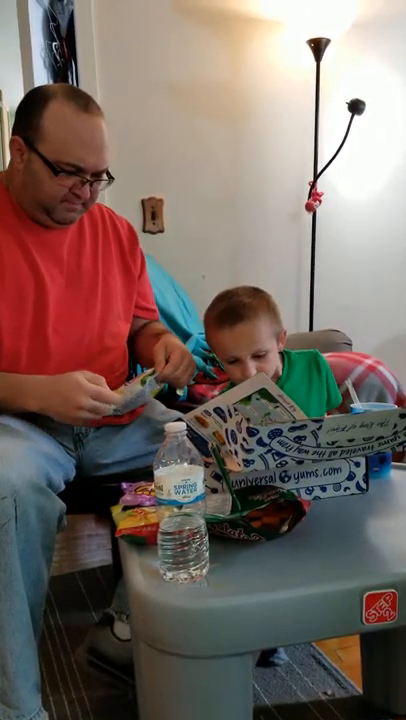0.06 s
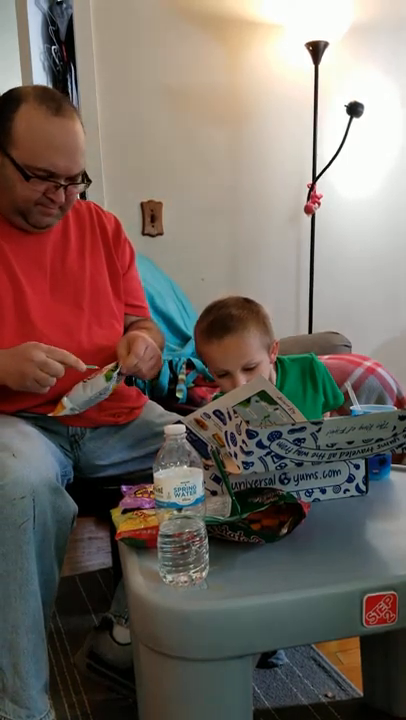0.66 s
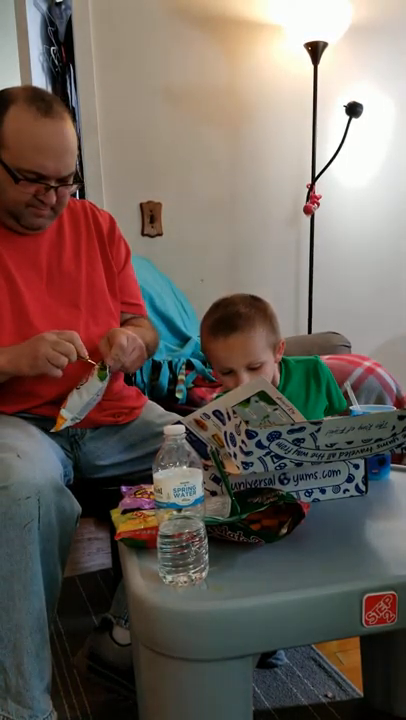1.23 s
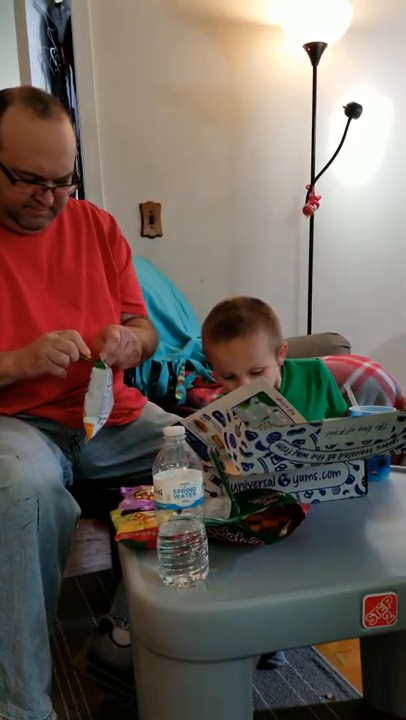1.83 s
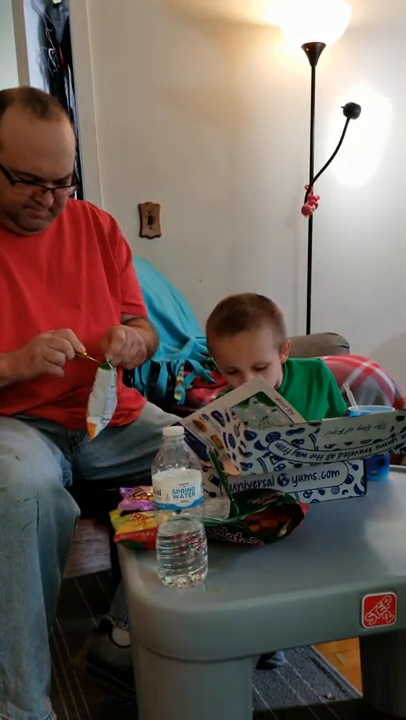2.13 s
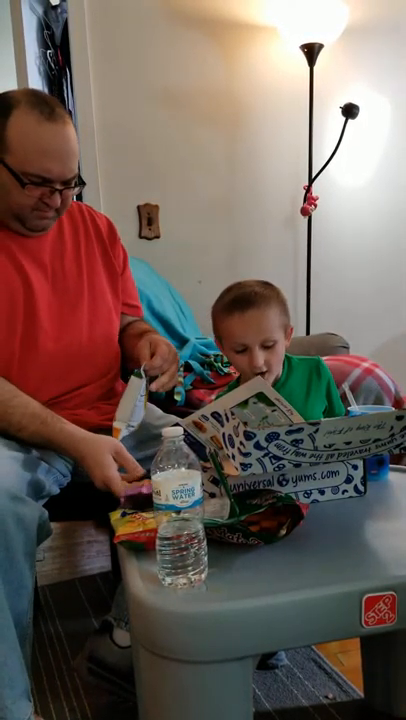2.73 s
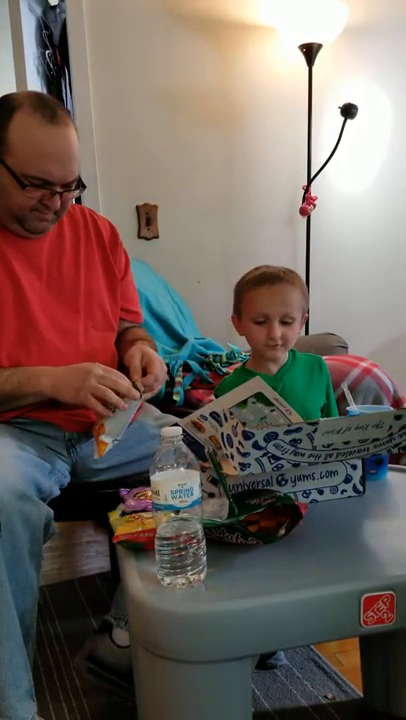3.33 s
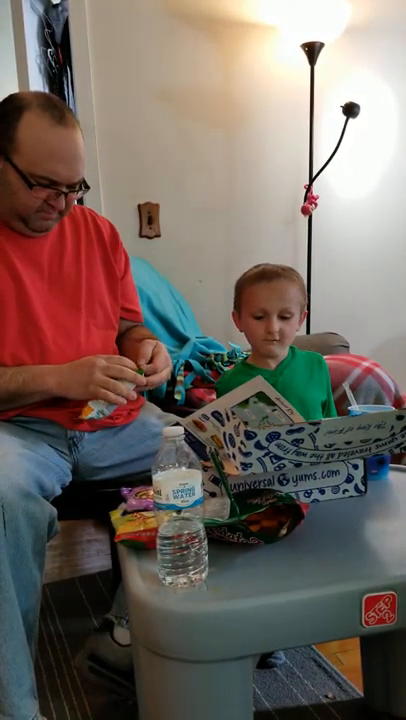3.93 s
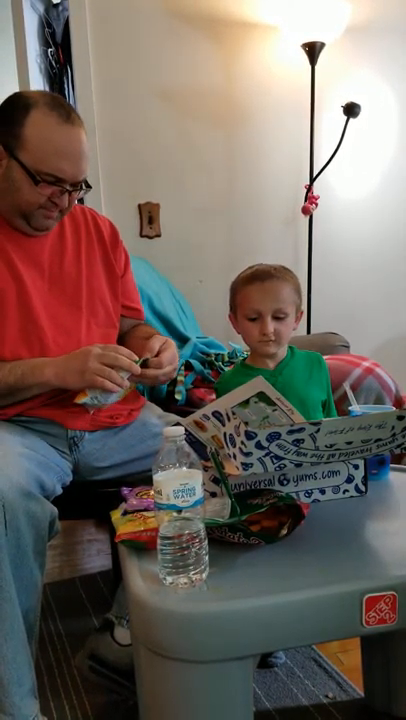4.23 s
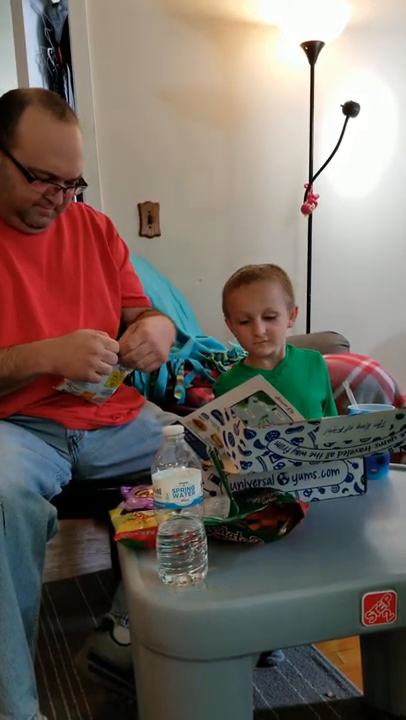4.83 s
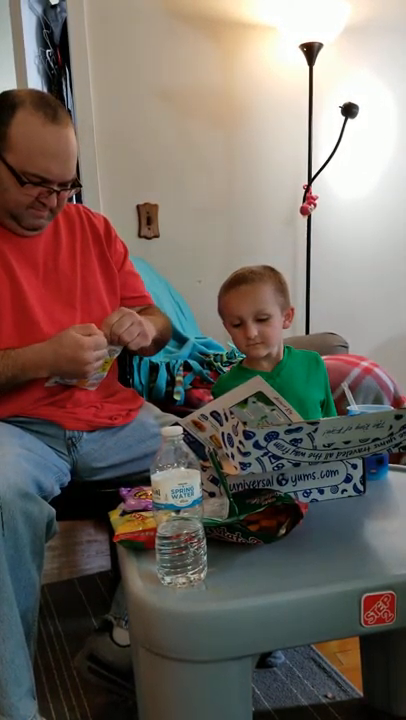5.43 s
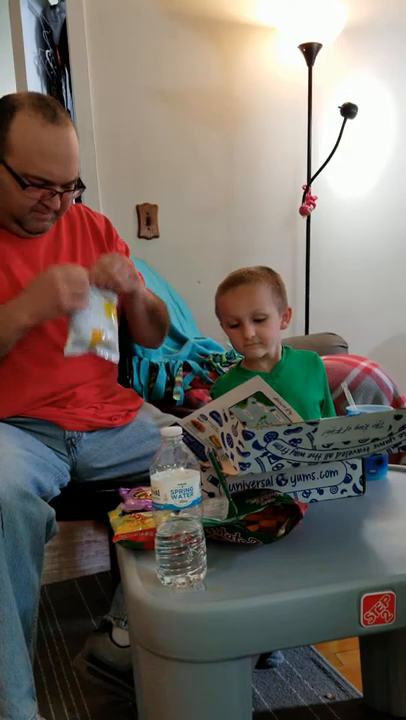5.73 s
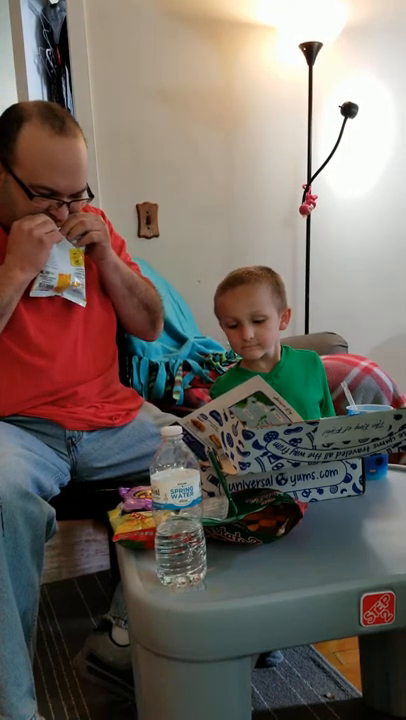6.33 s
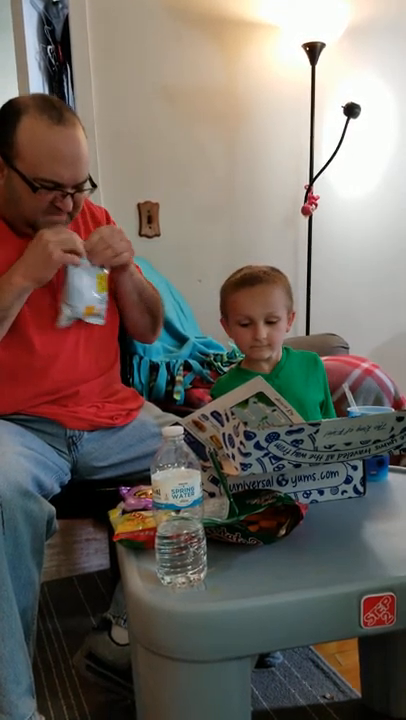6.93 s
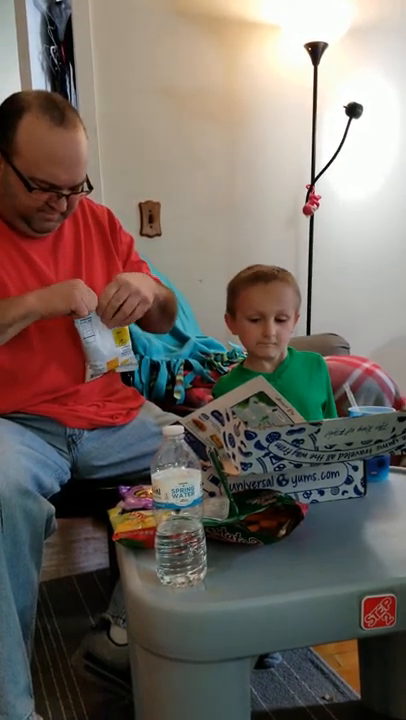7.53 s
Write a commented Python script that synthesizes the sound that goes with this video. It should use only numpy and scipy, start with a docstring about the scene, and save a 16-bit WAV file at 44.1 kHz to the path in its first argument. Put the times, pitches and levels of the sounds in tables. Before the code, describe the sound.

In a quiet living room with a low hum, a plastic snack packet crackles and snaps as it is tugged again and again. The crinkling pauses for a short, boomy scrape with a few knocks on a hollow plastic table, then carries on in dense bursts. Soft handling thumps touch the microphone at the end. The sound is a metre or two off, with the right side muffled to little but bass.

```python
"""Living room, handheld camera a metre or two from a sofa; the right microphone is all but blocked and
hears little except bass. From the start, over a low hum, hands pull at a small plastic snack packet:
each pull sets off a fine crackle, the film buckles in sharp snaps, and the room answers each snap.
A hollow plastic table takes a faint knock at 0.8 s, and something scuffs across it from 2.6 to 3 s.
Around 6 s teeth take over the pulling; from 6.8 s the packet is lowered and the camera is nudged."""
import sys
import numpy as np
from scipy import signal
from scipy.fft import rfft, irfft
from scipy.io import wavfile
from scipy.ndimage import uniform_filter1d

SR = 44100
rng = np.random.default_rng(int(sys.argv[2]) if len(sys.argv) > 2 else 0)


def materialize(psi):
    """Save the field psi as 16-bit PCM at rate SR to the path in sys.argv[1].

    A 1-D psi becomes a single channel; in a 2-D psi each row is a channel.
    """
    bounded = np.clip(np.atleast_2d(psi).T, -1, 1)
    quanta = np.round(bounded * 32767).astype(np.int16)
    wavfile.write(sys.argv[1], SR, quanta)


N = 333816
TIME, HZ = np.arange(N) / SR, np.fft.rfftfreq(N, 1 / SR)
SAMPLES_PER_MS = SR / 1000


def amp(db):
    """Decibels to gain."""
    return 10 ** (np.asarray(db) / 20)


def read(points, hz, column=1):
    """One column of a table, interpolated on a log-frequency axis."""
    points = np.asarray(points, float)
    return np.interp(np.log(hz + 1), np.log(points[:, 0] + 1), points[:, column])


def add(mix, start_s, sound):
    """Mixes a sound in at start_s."""
    part = mix[max(round(start_s * SR), 0):][:len(sound)]
    part += sound[:len(part)]


def causal(db):
    """The minimum-phase response with this gain: it rings only after its cause."""
    cepstrum = irfft(np.log(amp(db)))
    half = len(cepstrum) // 2
    cepstrum[1:half] *= 2
    cepstrum[half + 1:] = 0
    return np.exp(rfft(cepstrum))


def colour(x, spectrum, rings=()):
    """A filter of unit power gain: a smooth spectrum with narrow peaks or dips."""
    peaks_db = sum(lift_db / (1 + (2 * (HZ - hz) / width) ** 2) for hz, width, lift_db in rings)
    db = read(spectrum, HZ) + peaks_db
    return irfft(rfft(x) * causal(db), N) / np.sqrt(np.mean(amp(db) ** 2))


def brighten(x, db, split_hz=2500):
    """Raises or lowers the treble along a curve of dB."""
    body = irfft(rfft(x) / (1 + (HZ / split_hz) ** 4), N)
    return body + (x - body) * amp(db)


# Room tone at the two microphones: frequency_hz, left_db_per_hz, right_db_per_hz
ROOM_TONE = [(20, -95, -94), (65, -82.5, -80.5), (128.5, -84, -95), (208, -95, -106), (400, -101, -111),
             (1070, -108, -115), (3300, -113, -118), (4830, -110, -119), (9000, -119, -121),
             (11600, -115, -117), (15900, -116, -113)]
def room_tone():
    """Low room hum and faint hiss in each microphone, there throughout."""
    density = amp([read(ROOM_TONE, HZ, column) for column in (1, 2)]) * np.sqrt(SR / 2)
    return irfft(rfft(rng.standard_normal((2, N))) * density, N)


# First reflections off lap, table and walls: delay_s, level_db
REFLECTIONS = [(.0067, -13), (.0075, -18.5), (.0089, -12.5), (0.0104, -17.5), (0.0092, -16), (0.02, -12)]
# Decay of the living room: frequency_hz, t60_s
ROOM_DECAY = [(150, 0.72), (530, 0.3), (1400, 0.26), (3700, 0.27), (9700, 0.22), (16000, 0.25)]
def room_path(direct_db, tail_db=-3.0, echo_db=0, wander=0.06, build_s=0.0013):
    """From one spot in the room to the microphone: direct sound, a few echoes, a diffuse tail."""
    t = TIME[:SR // 2]
    hz, frame_s, noise = signal.stft(rng.standard_normal(len(t)), SR, nperseg=256)
    t60_s = read(ROOM_DECAY, hz)[:, None]
    decaying = noise * np.exp(-np.log(1000) * frame_s / t60_s) / np.sqrt(t60_s)
    tail = signal.istft(decaying, SR, nperseg=256)[1][:len(t)]
    tail *= 1 - np.exp(-(t / build_s) ** 2)
    path = amp(tail_db) * tail / np.linalg.norm(tail)
    for delay_s, db in REFLECTIONS:
        add(path, delay_s * (1 + wander * rng.uniform(-1, 1)), amp([db + echo_db]))
    path[0] += amp(direct_db)
    return path


def buckle(body_db=0, air_db=0, rise_s=0.00019, flip_s=0.00041, flutter_s=0.0017, ripple_db=1.5):
    """A facet of film flips and flutters: a broadband burst, rippled by the facet's own resonances."""
    size = 1024
    t, hz = TIME[:size], np.fft.rfftfreq(size, 1 / SR)
    swing = (1 - np.exp(-t / rise_s)) * (np.exp(-t / flip_s) + 0.45 * np.exp(-t / flutter_s))
    burst = rfft(rng.standard_normal(size) * swing)
    even_db = -10 * np.log10(uniform_filter1d(abs(burst) ** 2, size=27))  # fills deep spectral holes
    ripple = rng.standard_normal(30)
    facet = np.interp(hz, np.geomspace(600, 16000, 30), ripple - uniform_filter1d(ripple, size=5))
    tilt_db = read([(350, 0.85 * body_db), (800, body_db), (1300, body_db), (2100, 0.68 * body_db),
                    (2900, 0.005), (6000, 0), (8800, air_db)], hz)
    return irfft(burst * causal(even_db + tilt_db + ripple_db * facet))[:size // 2]


# Pulls at the packet, over on the sofa: start_s, length_s, level_db, brightness_db
PACKET_PULLS = [(0, 0.032, -44, -6.5), (.1, 0.18, -55.5, -4.5), (0.339, 0.034, -56, -11),
                (0.582, 0.071, -55.5, -9), (0.898, 0.033, -58, -16), (1.13, 0.063, -56, 3),
                (1.247, 0.058, -54, -5), (1.408, .07, -41.5, 3), (1.53, 0.043, -44, -3),
                (1.68, 0.039, -53, -10), (1.99, 0.094, -60.5, -9), (2.204, 0.032, -48.5, -13),
                (2.36, 0.11, -55, -8), (3.168, 0.054, -49, -8.5), (3.311, .12, -40, -6),
                (3.453, 0.29, -49, -9), (3.8, 0.18, -46, -7), (4.066, 0.54, -57, -7), (4.528, .1, -44, -5),
                (4.662, 0.096, -51.5, -9), (4.954, 0.23, -45, -6), (5.235, 0.27, -53.5, -11.5),
                (5.573, 0.074, -46.5, -2), (5.698, .14, -40.5, -8.5), (5.88, 0.21, -50.5, -7.5),
                (6.155, .11, -48, -11), (6.416, 0.086, -45, -6), (6.827, 0.077, -42.5, -4),
                (7.03, 0.06, -43.5, -7), (7.122, .1, -52.5, -14), (7.262, 0.065, -48, -7),
                (7.475, 0.049, -52.5, 0), (7.529, .04, -44.5, 2)]
def pulling(attack_s=0.0055, release_db_per_s=328, held_db=-78, held_bright_db=-3):
    """Level and brightness of the crackle in dB: slack is taken up, the pull holds, creases settle."""
    power = np.full(N, amp(held_db) ** 2)
    weighted_bright = power * held_bright_db
    for start_s, length_s, db, bright_db in PACKET_PULLS:
        attack = np.clip((TIME - start_s) / attack_s + 0.5, 0, 1)
        release_db = release_db_per_s * np.clip(TIME - start_s - length_s, 0, 1)
        pull = (attack * amp(db - release_db)) ** 2
        power += pull
        weighted_bright += pull * bright_db
    return 10 * np.log10(power), weighted_bright / power


def crackle(clicks_per_s=600, spread_db=6.0, gain_db=-2, creases=24):
    """Small creases give way at random under each pull, a few large and many tiny."""
    pull_db, bright_db = pulling()
    gives_way = rng.random(N) < clicks_per_s / SR
    clicks = gives_way * amp(spread_db * np.minimum(rng.exponential(1, N), 4))
    local_rms = np.sqrt(abs(uniform_filter1d(clicks ** 2, size=1500)) + 1e-4)
    clicks *= amp(pull_db + gain_db) / local_rms
    crease, out = rng.integers(0, creases, N), np.zeros(N)
    for k in range(creases):
        crease_sound = signal.fftconvolve(room_path(direct_db=-4), buckle())
        out += signal.oaconvolve(clicks * (crease == k), crease_sound)[:N]
    return brighten(out, bright_db) * np.sqrt(2 / (1 + amp(bright_db) ** 2))


# Clear snaps, a metre or two off; body lies near 1 kHz, air near 11 kHz, aim lifts the direct sound:
# start_s, level_db, body_db, air_db, aim_db
FILM_SNAPS = [(.0052, -25, 4.5, -2, 3.5), (.086, -29.5, -4, -3.5, 0), (0.1471, -28.5, -2.5, -3, -3),
              (0.2248, -35, -4.5, -3, 3), (.2403, -32.5, -9, -3, 3), (0.6064, -28.5, -5, -10.5, -5),
              (0.9127, -39, 4, -17, 1), (1.12, -27.5, -7, 7, -2.5), (1.1268, -38, -11, 9, 6),
              (1.1786, -20, -7, 1.5, 2.5), (1.202, -30, 10.5, -20, -2), (1.2411, -20.5, 7, 4, 1),
              (1.2842, -28, -6, 7, 4), (1.2893, -24, -12, -15, 6), (1.2984, -21, 4.5, -7, 4),
              (1.317, -23, -14, 0, 2), (1.391, -27, 9, 0, -1.5), (1.407, -15, -3, -2, -5),
              (1.42, -22, 10.5, -3, -2.5), (1.432, -19, -3, 5, -8), (1.4384, -21.5, 7.5, 0, 5.5),
              (1.4457, -12.5, -0.5, 2, -1.5), (1.4551, -30, 4, 6, 3), (1.4658, -23.5, -10, 6, 0),
              (1.5237, -30.5, 4, -9, -1), (1.5478, -25, 9, -11, -3), (1.573, -20.5, 1, -5, 2),
              (1.672, -27, -1, -0.5, 2), (1.681, -24, -18, 2, -3), (1.7076, -29.5, 8, -9, -5),
              (1.8207, -28.5, -4.5, -11, 2), (2.0815, -36.5, 9, -10, -4.5), (2.2155, -17, 6.5, -6, -0.5),
              (2.2264, -21, 6, -1, 0), (2.291, -28.5, 5.5, -5, 2), (2.3453, -30, 4, -11, 1.5),
              (2.4142, -25, 1.5, -3.5, 0.5), (2.5283, -28, 0, 4.5, -3), (3.1107, -32.5, 2, -7, -4.5),
              (3.2007, -27.5, 1, -10, -0.5), (3.2588, -31.5, 0, -23, -5), (3.3005, -23, 5, -3, -1.5),
              (3.308, -21.5, 4.5, -4, -7), (3.356, -20, -0.5, 3, 2), (3.377, -18, 0, -1, 2),
              (3.3876, -30, -7, 10, 4), (3.3942, -25, -9, 5, -7), (3.4191, -17.5, -16, 5, -1),
              (3.4598, -20, 0.5, -1, -2), (3.4968, -30, 6.5, 3.5, 4), (3.5235, -29.5, 8.5, -11, -5),
              (3.5704, -24, 0, -1, -1), (3.59, -19, 1, -4, 0), (3.606, -25, -7, 7.5, 2),
              (3.6386, -25.5, -5, 3, 3), (3.7119, -30.5, 3.5, -3, 4.5), (3.7947, -34, 3.5, -10, .5),
              (3.8633, -30.5, -9, 0.5, -1), (3.8958, -22, -3.5, -12, -7), (3.9002, -20, -2.5, 2, -2),
              (3.9068, -22.5, -0.5, 5.5, -4), (3.9227, -39, -7, 12, 6), (3.947, -24, -7, 2, 1),
              (4.0235, -30.5, 1, 1.5, 1), (4.032, -41.5, -14, 10, 8), (4.062, -26.5, 3, -5, -4),
              (4.1342, -36.5, 10, -1, -3), (4.142, -28, -15, 4, 1), (4.2609, -34.5, -18, -1, -0.5),
              (4.3413, -31, 4, 1, -15), (4.4596, -40, -8, 6, -14), (4.521, -25.5, 2.5, 4, -9),
              (4.5663, -19.5, -2, 5.5, .5), (4.5971, -23, -1, -10, 1), (4.644, -26.5, -1.5, -11, 2.5),
              (4.8398, -36.5, 2.5, -3, -5), (4.8774, -22.5, -6, -3.5, -2.5), (4.8924, -26.5, 0, -3, 1),
              (4.91, -26, 2.5, -4, -4), (4.9705, -19, -1.5, 4, -1.5), (5.013, -23, -5, 0, -7),
              (5.0441, -25, 3.5, 0.5, 3), (5.0769, -22.5, 2.5, -7, -6), (5.0922, -24, 4, -2, 3),
              (5.1239, -26, 7, -24, 1), (5.1551, -18, -6, 1, 0.5), (5.1809, -23, -5, -11, -6),
              (5.3171, -22.5, 4, -2.5, -2.5), (5.333, -26.5, -26, 1.5, 4), (5.561, -17.5, -5, -4, -1.5),
              (5.5675, -24, -18, -8, 3), (5.5815, -23, -13, -4, 2), (5.5885, -30, -8, 3, 2),
              (5.6134, -28, -11, 3, 7), (5.6217, -36, -12, 6, 13), (5.6826, -19, -3, 0.5, -1.5),
              (5.688, -27, -3, 7, 5), (5.7065, -15.5, 3, -19, -1), (5.7568, -18.5, 1.5, -5, 2.5),
              (5.802, -21, -1.5, -20, -3), (5.8342, -29.5, 10, 0.5, 2), (5.852, -26.5, 1.5, -31, 2),
              (5.9183, -31, 9, -4, -2), (5.9677, -39, 12, -10, -1), (6.003, -26, 4.5, -2.5, 1.5),
              (6.0766, -31.5, 11, -10, -1.5), (6.1244, -26.5, 8.5, 0.5, 0.5), (6.1573, -29, 5.5, 5.5, 5.5),
              (6.1701, -22.5, 6, 0, 0.5), (6.1845, -27.5, 6, 2, 4), (6.231, -26, -0.5, -2, 4),
              (6.3562, -28, -1.5, 8, 3), (6.404, -38.5, 13.5, 0, 2.5), (6.4181, -17.5, -3, 0.5, 1),
              (6.4357, -24.5, -5, -4, -3), (6.455, -28, 10, -4, 5), (6.5511, -31, 2, 1, -0.5),
              (6.6042, -34, 7, -10, -2.5), (6.6249, -20.5, 2.5, -1.5, 1), (6.6381, -26, -2.5, 3, 6.5),
              (6.7266, -27.5, -6.5, -10, 5), (6.7765, -32.5, -2, -21, -0.5), (6.818, -21, -11.5, 1.5, 3.5),
              (6.8406, -26, 0, -8, -3), (6.8948, -19, 0.5, 3.5, 3), (6.9082, -22, 5.5, -12, -3.5),
              (6.9337, -26, 7, 1, -2), (6.991, -20.5, -0.5, -1.5, -3), (7.0251, -24, 7, -3, -8),
              (7.0421, -21.5, 3, 7.5, 8), (7.159, -32.5, -1, -11, -3), (7.2855, -25, 0, 2, -5),
              (7.5454, -22, 1, 1.5, -7.5)]
def snaps(gain_db=-1.34, direct_db=-5.0, tick_db=-13, tick_spread_db=3, tick_lag_s=0.0068):
    """The film buckles, facing the microphone more or less; a small, dry, bright tick follows."""
    out = np.zeros(N)
    scatter = rng.uniform(-1, 1, (len(FILM_SNAPS), 2))
    for (start_s, db, body_db, air_db, aim_db), (shift, swell) in zip(FILM_SNAPS, scatter):
        strength = amp(db + gain_db) * np.sqrt(SAMPLES_PER_MS)
        snap = signal.fftconvolve(room_path(direct_db + aim_db), buckle(body_db, air_db))
        add(out, start_s, strength * snap)
        tick = amp(tick_db + tick_spread_db * swell) * buckle(body_db=-8, air_db=air_db + 5)
        add(out, start_s + tick_lag_s * (1 + 0.22 * shift), strength * tick)
    return out


# Tone of the crinkling as heard in this room: frequency_hz, level_db
CRINKLE_SPECTRUM = [(40, -40), (120, -15), (180, -12), (290, -3.5), (450, -2.5), (550, -10.5), (720, -4.5),
                    (1000, -5.5), (2250, -1), (2900, -3), (7700, -7), (8800, -11.5), (12500, -10.5),
                    (16000, -17)]
# Peaks of the room and microphone: centre_hz, width_hz, lift_db
ROOM_MICROPHONE_PEAKS = [(1774, 250, 4), (2210, 73, 2), (4400, 1300, 1), (7520, 740, 3)]
def crinkling():
    """Fixed room and microphone peaks colour every snap and crackle."""
    return colour(snaps() + crackle(), CRINKLE_SPECTRUM, ROOM_MICROPHONE_PEAKS)


# Low, middle and high modes of the puffed-up pouch: centre_hz, width_hz
POUCH_MODES = [(330, 400), (835, 160), (1340, 57)]
# Holds, in turn: dangling, cupped, pinched at the seam, lifted, between the teeth, tugged taut, lowered:
# start_s, low_lift_db, middle_lift_db, high_lift_db
HOLDS = [(0, 0, 4.5, 6), (3, 1.5, 2, 9.5), (5.05, 2, 8, 0.5), (5.65, -0.5, 4, -2), (5.95, -10, 5.5, 6),
         (6.43, -2, 13.5, 6.5), (6.8, -1, 7, 2.5)]
def pouch(film_sound, regrip_s=0.21):
    """The walls of the pouch ring along with the film, as freely as each hold lets them."""
    start_s, *lifts_db = np.transpose(HOLDS)
    hold = np.searchsorted(start_s[1:], TIME)
    out = film_sound.copy()
    for (hz, width_hz), lift_db in zip(POUCH_MODES, lifts_db):
        mode = signal.lfilter(*signal.iirpeak(hz, hz / width_hz, SR), film_sound)
        lift = amp(uniform_filter1d(lift_db[hold], size=int(regrip_s * SR)))
        out += (lift - 1) * mode
    return out


# Knocks and catches on the table, each tick relative to its knock: start_s, level_db, tick_db
TABLE_KNOCKS = [(0.792, -42.5, -26), (2.768, -21.5, -17), (2.789, -14.5, -42), (2.805, -15, -10.5),
                (2.812, -20, -7), (2.848, -15.5, -17), (2.879, -29.5, 2), (2.897, -21.5, -18)]
def knocks(blow_db=-2):
    """Short impacts: the blows that drive the table top, and their sharp ticks."""
    blows, ticks = np.zeros((2, N))
    for start_s, db, tick_db in TABLE_KNOCKS:
        burst = np.sqrt(SAMPLES_PER_MS) * buckle()
        add(blows, start_s, amp(db + blow_db) * burst)
        add(ticks, start_s, amp(db + tick_db) * burst)
    return blows, colour(ticks, CRINKLE_SPECTRUM)


# Course of the one scuff across the table: time_s, drumming_db, scratch_db, brightness_db
SCUFF_COURSE = [(2.59, -64, -64, -4), (2.61, -48, -42, 1), (2.665, -45.5, -30.5, -3.5),
                (2.735, -39, -44, 5), (2.78, -28.5, -38, -4), (2.815, -28, -41, -5),
                (2.9, -32.5, -42.5, 1.5), (2.985, -43, -65, 2), (3.04, -71, -75, 11)]
# Scratch of the sliding surface: frequency_hz, level_db
SCRATCH_SPECTRUM = [(150, -11), (600, -9), (950, 0), (1300, -2), (2400, 0), (3200, -10), (4300, -8.5),
                    (6000, -16), (7500, -15), (9000, -22.5), (16000, -24)]
def scuff(slips_per_s=600, grit_per_s=4000, slip_db=-1):
    """Sliding friction: the uneven slips that drum on the top, and the scratch of fine grit."""
    time_s, *columns = np.transpose(SCUFF_COURSE)
    drum_db, scratch_db, bright_db = (np.interp(TIME, time_s, c, left=-120, right=-120) for c in columns)
    impulses = ((rng.random(N) < rate / SR) * rng.standard_normal(N) for rate in (slips_per_s, grit_per_s))
    slips, grit = (x / np.sqrt(abs(uniform_filter1d(x ** 2, size=1200)) + 1e-5) for x in impulses)
    scratch = colour(amp(scratch_db) * grit, SCRATCH_SPECTRUM)
    return amp(drum_db + slip_db) * slips, brighten(scratch, bright_db)


# Squeaks partway through the scuff: start_s, length_s, pitch_hz, level_db
SCUFF_SQUEAKS = [(2.729, 0.013, 4400, -46), (2.739, 0.02, 4480, -34)]
def squeaks(waver=0.046):
    """The surface grips for an instant and sings at an unsteady pitch."""
    out = np.zeros(N)
    for start_s, length_s, hz, db in SCUFF_SQUEAKS:
        wobble = uniform_filter1d(rng.standard_normal(int(length_s * SR)), size=40)
        turns = np.cumsum(hz * (1 + waver * wobble / wobble.std())) / SR
        add(out, start_s, amp(db) * np.hanning(len(turns)) * np.sin(2 * np.pi * turns))
    return out


# Tone of the hollow plastic top: frequency_hz, level_db
TOP_SPECTRUM = [(30, -32), (70, -21), (115, 0), (170, -7), (270, 5.5), (450, 1), (700, -5.5), (1250, -6.5),
                (2000, -18.5), (5000, -28), (16000, -37.5)]
# Its resonances and dips: centre_hz, width_hz, lift_db
TOP_RINGS = [(112.4, 12.4, 5), (265, 9.8, 0), (312, 14, -12), (398, 22.4, 2), (470, 18, -2), (545, 14, 6.5),
             (614, 16, 4), (920, 44, 2)]
def hollow_table():
    """The top booms under knocks and slips, with only a little room sound."""
    slips, scratch = scuff()
    blows, ticks = knocks()
    boom = colour(slips + blows, TOP_SPECTRUM, TOP_RINGS)
    path = room_path(direct_db=-1, tail_db=-6.5, echo_db=-7.5)
    return signal.oaconvolve(boom + scratch + squeaks() + ticks, path)[:N]


# Handling noise, right at the microphones: time_s, level_db, pitch_hz
CAMERA_NUDGES = [(6.839, -46, 59), (6.93, -44.5, 63.2), (7.103, -52, 90), (7.18, -53, 86),
                 (7.402, -47, 52.4), (7.448, -55, 65), (7.552, -49, 80)]
def nudges(cycles=2.16, left_db=-1, right_db=0):
    """Short, soft thumps travel through the camera body to both microphones."""
    out = np.zeros(N)
    for time_s, db, hz in CAMERA_NUDGES:
        t = TIME[:int(cycles * SR / hz)]
        add(out, time_s - 0.5 / hz, amp(db) * np.sin(2 * np.pi * hz * t) * np.hanning(len(t)))
    return out * amp([[left_db], [right_db]])


# What gets through to the right microphone: frequency_hz, gain_db
MICROPHONE_LEAK = [(60, -7), (200, -27), (400, -27.5), (700, -35), (1300, -45), (16000, -44)]
def blocked_microphone(sound, lag_s=0.00069):
    """The blockage lets in only a late, muffled trace."""
    delay = np.exp(-2j * np.pi * HZ * lag_s)
    return irfft(rfft(sound) * amp(read(MICROPHONE_LEAK, HZ)) * delay, N)


def scene():
    """Packet and table in the open left microphone, muffled in the right; nudges and room tone in both."""
    left = pouch(crinkling()) + hollow_table()
    return np.array([left, blocked_microphone(left)]) + nudges() + room_tone()


def record(dry):
    """The camera's sound rolls off at 16.1 kHz."""
    lowpass = signal.firwin(255, 16100, window=("kaiser", 8), fs=SR)
    return signal.oaconvolve(dry, lowpass[None], "same")


dry = scene()
out = record(dry)
materialize(out)
```